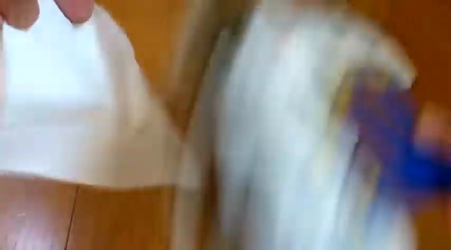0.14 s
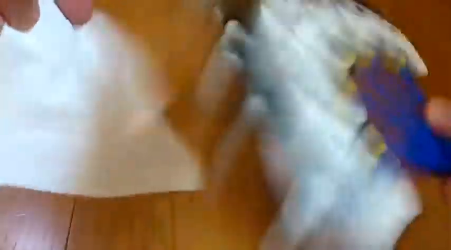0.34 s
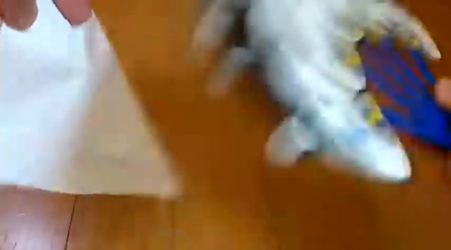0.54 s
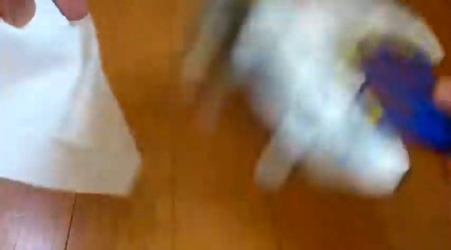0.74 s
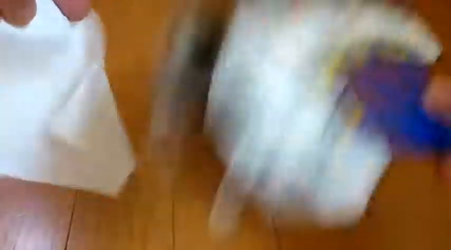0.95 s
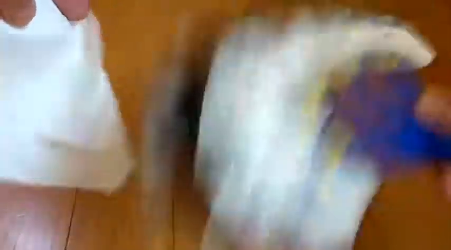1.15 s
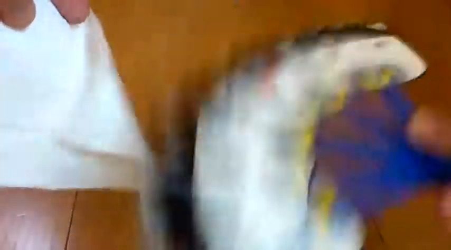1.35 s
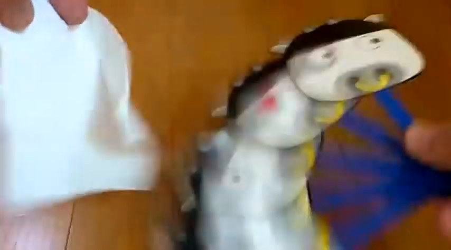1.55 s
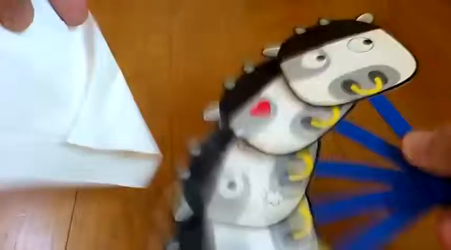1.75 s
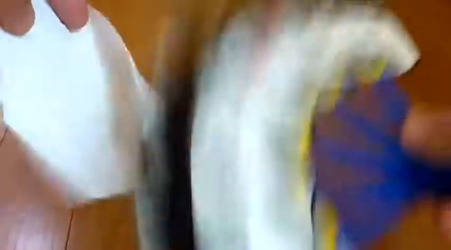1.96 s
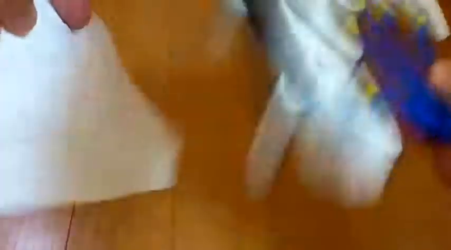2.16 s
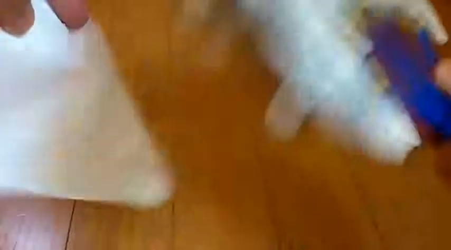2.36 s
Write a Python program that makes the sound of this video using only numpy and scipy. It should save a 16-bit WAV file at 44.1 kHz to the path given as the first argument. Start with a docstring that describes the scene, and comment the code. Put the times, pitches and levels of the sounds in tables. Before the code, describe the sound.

A paper fan with plastic ribs gives a few light ticks, a loud hollow double snap, then uneven soft rustling, clicking and short scrapes, close to the microphone in a small room with faint hiss.

```python
"""A faint mains hum, room rumble and soft hiss come first: low sines and coloured noise.
Close to the microphone a paper fan with plastic ribs is waved: its leaf rustles in showers of tiny
clicks at every turn of the hand, and its ribs tick and scrape. Early on it snaps taut with a double
crack, sharp noise bursts that knock the drum-like leaf. Fan modes, an echo and a short room tail
ring after the contacts; later come low draughts of air and a dull rub of the hand on the grip."""
import sys
import numpy as np
from scipy import signal
from scipy.fft import rfft, irfft
from scipy.io import wavfile
from scipy.ndimage import uniform_filter1d

SR = 44100
rng = np.random.default_rng(int(sys.argv[2]) if len(sys.argv) > 2 else 0)


def unload_wav(signal):
    """Save mono or channel-first audio to the path in sys.argv[1] as 16-bit WAV at rate SR, clipped to [-1, 1]."""
    wavfile.write(
        sys.argv[1],
        SR,
        np.round(np.clip(np.atleast_2d(signal).T, -1, 1) * 32767).astype(np.int16),
    )


N = 105840
HIT_SIZE = 4096  # samples in one contact
TILT_PIVOT_HZ = 5000  # a tilt leaves this pitch unchanged
RIB_SPREAD = 1  # independent left and right noise, relative to the shared noise
LEAF_PAN_DB = 2.5  # left minus right


def from_db(db):
    """Decibels to gain."""
    return 10 ** (np.asarray(db) / 20)


def rms_one(x):
    """Scale to unit rms."""
    return x / np.sqrt(np.mean(x ** 2) + 1e-20)


def bins(size):
    """Frequencies in Hz of a spectrum of that many samples, at least 1."""
    return np.maximum(np.arange(size // 2 + 1) * SR / size, 1)


def at_hz(points, size):
    """Read a table at every bin, along a log-frequency axis."""
    hz, value = np.transpose(points)
    return np.interp(np.log(bins(size)), np.log(hz), value)


def octaves_from_pivot():
    """Distance of each bin of a contact from the tilt pivot."""
    return np.log2(bins(HIT_SIZE) / TILT_PIVOT_HZ)


def panned(db):
    """Left and right gains for a level difference, left minus right."""
    return from_db(np.array([[.5], [-.5]]) * db)


def colour(x, db):
    """Causal (minimum-phase) filter with the given gain at each frequency."""
    size = x.shape[-1]
    cepstrum = irfft(np.log(from_db(db)), size)
    # folding the cepstrum forward makes the response minimum-phase
    cepstrum[1:size // 2] *= 2
    cepstrum[size // 2 + 1:] = 0
    return irfft(rfft(x) * np.exp(rfft(cepstrum)), size)


def wander(size, count):
    """Straight lines between that many random points of unit spread."""
    return np.interp(np.linspace(0, count - 1, size), np.arange(count), rng.standard_normal(count))


def swells(events, t):
    """Bell-shaped gains, each falling to 1/e one half length from its middle."""
    return sum(from_db(db) * np.exp(-((t - s) / half_s) ** 2) for s, db, half_s in events)


def add(out, s, sound):
    """Mix a sound in at a time in seconds."""
    start = int(s * SR)
    out[:, start:start + sound.shape[1]] += sound[:, :max(N - start, 0)]


# How alike left and right are in diffuse noise: pitch_hz, correlation (0 to 1)
STEREO_LIKENESS = [(600, 0.66), (1500, 0.05), (5000, 0.019)]


def diffuse(size):
    """Stereo noise from all around: alike in the bass, almost unrelated in the treble."""
    mid, side = rfft(rng.standard_normal((2, size)))
    alike = np.clip(at_hz(STEREO_LIKENESS, size), -1, 1)
    shared = np.sqrt((1 + alike) / 2) * mid
    opposed = np.sqrt((1 - alike) / 2) * side * [[1], [-1]]
    return irfft(shared + opposed, size)


# Spectrum of the still air of the room: pitch_hz, relative_level_db (per Hz)
AIR_COLOUR = [(25, 3.5), (60, 3.5), (150, -6), (205, -3), (300, -10), (1000, -10.5), (3500, -16.5),
              (5200, -17), (8500, -19.5), (10500, -24), (16000, -28)]


def background(air_db=-57, air_swell_db=0.72, hum_hz=119.8, hum_db=-61.5, hum_waver=0.35, pan_db=1.5):
    """Coloured noise gives low rumble and hiss; a sine wavering in phase and level gives mains hum."""
    t = np.arange(N) / SR
    air = rms_one(colour(diffuse(N), at_hz(AIR_COLOUR, N)))
    air_level = from_db(air_db + air_swell_db * wander(N, count=20))
    hum_wave = np.sin(2 * np.pi * hum_hz * t + .5 * wander(N, count=60))
    hum = rms_one(hum_wave * (1 + hum_waver * wander(N, count=24)))
    return panned(pan_db) * (air_level * air + from_db(hum_db) * hum)


# Tone of the papery clicks: pitch_hz, gain_db
CLICK_COLOUR = [(200, -12.5), (660, 1.5), (1200, -1), (3500, 0.5), (5500, 5), (8200, -2), (11000, -7.5)]


def grains(per_s, size_spread_db=3.5):
    """Tiny papery clicks of uneven size, different on the two sides; rms 1."""
    size_db = size_spread_db * np.minimum(rng.exponential(1, N), 3)  # no click outgrows the rest by far
    sizes = from_db(size_db) * rng.choice([-1, 1], N)
    happens = rng.random(N) < per_s / SR
    clicks = happens * sizes * (1 + RIB_SPREAD * rng.standard_normal((2, N)))
    return rms_one(colour(clicks, at_hz(CLICK_COLOUR, N)))


# The leaf rustles at each turn of the hand: peak_s, level_db
HAND_TURNS = [(.125, -59), (.275, -50), (0.347, -51.5), (0.579, -59.5), (.81, -57), (1.047, -55.5),
              (1.25, -59.5), (1.468, -56.5), (1.69, -54), (1.907, -54), (2.26, -63)]
# Ribs slide over each other: middle_s, level_db, half_length_s
RIB_SLIDES = [(0.355, -53.5, 0.004), (0.4878, -44, 0.0059), (1.685, -51, .005), (1.898, -44.5, 0.0039),
              (2.046, -43, 0.0034)]


def rustle(rise_s=0.017, fall_s=0.032, creases_per_s=1500, slips_per_s=4000, clump_db=4, pan_db=3):
    """Creases give way in clumps, swelling at each turn; sliding ribs add short gritty scrapes."""
    t = np.arange(N) / SR
    effort = from_db(-70)  # the leaf keeps flexing between the turns
    for s, db in HAND_TURNS:
        distance = np.maximum((s - t) / rise_s, (t - s) / fall_s)
        effort = effort + from_db(db) * np.exp(-distance)
    clumps = rms_one(from_db(clump_db * wander(N, count=260)))
    creases = effort * clumps * grains(creases_per_s)
    scrapes = swells(RIB_SLIDES, t) * grains(slips_per_s)
    return panned(pan_db) * (creases + scrapes)


def contact(db, decay_ms, shape_db, balance_db, spread, edge=2.8, right_lag_s=.00008):
    """A sharp edge and dying chatter, evened then coloured; level is its energy as rms over 5 ms."""
    t = np.arange(HIT_SIZE) / SR
    chatter = rng.standard_normal((3, HIT_SIZE)) * np.exp(-t * 1000 / decay_ms)
    chatter[0, 0] = edge
    sides = []
    for force, sign in zip(chatter[0] + spread * chatter[1:], (1, -1)):
        power = uniform_filter1d(np.abs(rfft(force)) ** 2, size=40)
        uneven_db = 10 * np.log10(power + 1e-12)
        sides.append(colour(force, shape_db - uneven_db + sign * balance_db / 2))
    sides[1] = np.roll(sides[1], int(right_lag_s * SR))
    faded = np.array(sides) * (1 - t / t[-1])
    return from_db(db) * rms_one(faded) * np.sqrt(.005 * SR / HIT_SIZE)


# Ribs knock against each other: start_s, level_db, tilt_db_per_octave
RIB_TICKS = [(.1086, -42, 1), (0.115, -49, -5), (0.1388, -42.5, 1.5), (0.1968, -42.5, 2), (.2868, -38, 4.5),
             (.3288, -43, 3), (.3389, -34.5, -0.5), (0.3565, -45, 5), (.3628, -46.5, -1.5),
             (0.4154, -48, 2), (.4241, -48.5, -1.5), (.558, -51.5, -2.5), (.5922, -50, 3),
             (0.649, -51.5, -1), (0.7266, -44, 3), (.774, -53, 0), (.7909, -44, -3), (.8041, -47.5, -3),
             (0.8198, -45, 0.5), (0.8718, -41, .5), (1.0257, -43, -2), (1.1684, -50.5, 6),
             (1.212, -51.5, -4), (1.2301, -41.5, -2.5), (1.2602, -43, -1.5), (1.3209, -47.5, -1.5),
             (1.3645, -48.5, 6), (1.453, -50, -2), (1.4816, -45, -4), (1.5592, -52.5, -1),
             (1.5905, -48, 1.5), (1.6585, -50.5, -4), (1.6751, -40.5, -5), (1.7046, -42, -2),
             (1.7565, -39, 1), (1.883, -48, -6.5), (1.9158, -47.5, -3.5), (1.9636, -42, 3),
             (2.0424, -39.5, 3.5), (2.0572, -45.5, 3.5), (2.1189, -42, 1.5), (2.1275, -44, 5.5),
             (2.258, -47, -1.5), (2.3350, -48.5, -2.5), (2.385, -43, 2)]
# Tone of the ribs: pitch_hz, gain_db
RIB_TONE = [(300, -35), (1000, -31), (2200, -6), (2650, 4), (3500, 3), (4700, 5.5), (6000, 1), (8400, 1),
            (10000, -9), (16000, -17.5)]
# Stereo lean of the ribs: pitch_hz, left_minus_right_db
RIB_LEAN = [(600, 1.5), (3000, -0.5), (5000, 1.5), (7800, 15.5), (13000, 7.5)]
# Tone of the leaf under a tick: pitch_hz, gain_db
FLAP_TONE = [(250, -0.5), (520, 0.5), (700, 5), (1250, -1.5), (1900, 4.5), (6000, -38.5)]


def ticks(decay_ms=1.85, ripple_db=5, leaf_decay_ms=8.4, leaf_db=-13, leaf_db_per_tilt=-1.0):
    """Light knocks, each with a colour of its own, shake the leaf a little; dull ones shake it more."""
    out, octaves = np.zeros((2, N)), octaves_from_pivot()
    rib_db, lean_db = at_hz(RIB_TONE, HIT_SIZE), at_hz(RIB_LEAN, HIT_SIZE)
    flap_db = at_hz(FLAP_TONE, HIT_SIZE)
    for s, db, tilt in RIB_TICKS:
        shape_db = rib_db + tilt * octaves + ripple_db * wander(len(octaves), count=40)
        add(out, s, contact(db, decay_ms, shape_db, lean_db, RIB_SPREAD))
        flap_level_db = db + leaf_db + leaf_db_per_tilt * tilt
        add(out, s, contact(flap_level_db, leaf_decay_ms, flap_db, LEAF_PAN_DB, spread=0.44))
    return out


# The fan snaps taut: start_s, level_db, decay_ms, tilt_db_per_octave
SNAP_CRACKS = [(0.2367, -18, 1.36, -0.5), (0.2386, -19.5, 1.8, -0.5), (0.2517, -12.5, 0.94, 2.5)]
# Tone of the cracks: pitch_hz, gain_db
CRACK_TONE = [(150, -47.5), (330, -15), (700, -10), (1100, -3.5), (1700, -12), (2300, -3), (3250, 4.5),
              (4100, 1), (5000, 4), (5900, -3), (6800, 5), (8200, 1), (9800, -13.5), (13000, -9.5),
              (16000, -31)]
# Stereo lean of the cracks: pitch_hz, left_minus_right_db
CRACK_LEAN = [(500, -22), (2000, 12), (3300, 4), (5000, 3.5), (7600, 18.5), (10000, 21), (14000, 0)]


def snap():
    """Hard contacts of the ribs as the fan goes taut, close enough to be heard as a double crack."""
    out, octaves = np.zeros((2, N)), octaves_from_pivot()
    crack_db, lean_db = at_hz(CRACK_TONE, HIT_SIZE), at_hz(CRACK_LEAN, HIT_SIZE)
    for s, db, decay_ms, tilt in SNAP_CRACKS:
        add(out, s, contact(db, decay_ms, crack_db + tilt * octaves, lean_db, RIB_SPREAD))
    return out


# The open fan rings on: pitch_hz, peak_gain_db, t60_s
OPEN_FAN_MODES = [(490, -10, 0.044), (653.5, 11, 0.095), (3424, 1.5, 0.013)]


def ringing(x):
    """Ticks, cracks and rustle all excite the same few resonances of the open fan."""
    out = 0
    for hz, db, t60 in OPEN_FAN_MODES:
        r = from_db(-60 / (t60 * SR))  # decay per sample
        top = [(1 - r * r) / 2, 0, (r * r - 1) / 2]
        bottom = [1, -2 * r * np.cos(2 * np.pi * hz / SR), r * r]
        out = out + from_db(db) * signal.lfilter(top, bottom, x)
    return out


# Each crack strikes the leaf: start_s, gain_db
LEAF_STRIKES = [(0.2375, -2.5), (.2526, -9.5)]
# The taut leaf bellies out and knocks like a drum skin: pitch_hz, level_db (before gain), t60_s
TAUT_LEAF_MODES = [(70.6, -28.5, 0.025), (230, -37, 0.016), (458.4, -34.5, 0.059), (588, -32, 0.035),
                   (653, -28, .075), (735, -28.5, 0.055), (1030, -30, 0.048), (1364, -27, 0.023),
                   (1842, -44.5, 0.21)]


def leaf_knock():
    """The hollow modes of the taut leaf as dying sines, struck once for each half of the double crack."""
    out = 0
    for s, knock_db in LEAF_STRIKES:
        t = np.maximum(np.arange(N) / SR - s, 0)
        for hz, db, t60 in TAUT_LEAF_MODES:
            out = out + from_db(knock_db + db - 60 * t / t60) * np.sin(2 * np.pi * hz * t)
    return panned(LEAF_PAN_DB) * out


# Tone of the room tail: pitch_hz, gain_db
ROOM_TONE = [(200, -4), (650, 4.5), (1200, 2.5), (5000, -4), (7500, -6.5)]


def room(x, echo_s=.0074, echo_db=-13, echo_low_hz=3500,
         tail_db=-11, delay_s=0.0055, build_s=0.0014, t60_s=0.15):
    """One bright echo off the floor, and a quick diffuse decay fed by the left side."""
    size = 2 ** 15
    t = np.maximum(np.arange(size) / SR - delay_s, 0)
    tail = diffuse(size) * from_db(-60 * t / t60_s) * (1 - np.exp(-t / build_s))
    tail = rms_one(tail) / np.sqrt(size)  # unit energy before colour
    tail = colour(tail, tail_db + at_hz(ROOM_TONE, size))
    late = np.pad(x, ((0, 0), (int(echo_s * SR), 0)))[:, :N]
    echo = signal.lfilter(*signal.butter(1, echo_low_hz, "high", fs=SR), late)
    decay = signal.fftconvolve(x[:1], tail, axes=1)[:, :N]
    return from_db(echo_db) * echo + decay * panned(db=3.0)


# Draught of the fan on the microphone: time_s, level_db
DRAUGHT_LEVEL = [(.75, -87), (.92, -63), (1.55, -60), (1.8, -66), (2.3, -61)]
# Tone of the draught: pitch_hz, gain_db
DRAUGHT_TONE = [(25, -6), (54, -2), (200, -13.5), (600, -45.5)]


def draught():
    """The strokes send lumpy air over the microphone: deep noise that swells and sinks."""
    level = from_db(np.interp(np.arange(N) / SR, *np.transpose(DRAUGHT_LEVEL)))
    rumble = rms_one(colour(diffuse(N), at_hz(DRAUGHT_TONE, N)))
    return panned(LEAF_PAN_DB) * level * rumble


# The hand shifts on the grip: middle_s, level_db, half_length_s
GRIP_RUBS = [(2.175, -61.5, 0.12)]


def grip(band_hz=(127, 233)):
    """A soft low rub of the fingers on the ribs: a swell of band-limited noise."""
    band = signal.butter(2, band_hz, "band", fs=SR, output="sos")
    rub = rms_one(signal.sosfilt(band, diffuse(N)))
    return swells(GRIP_RUBS, np.arange(N) / SR) * rub


def scene():
    """The fan in its room."""
    fan = rustle() + ticks() + snap()
    fan = fan + ringing(fan) + leaf_knock()
    return background() + fan + room(fan) + draught() + grip()


def record(dry, cutoff_hz=16000):
    """Peaks past full scale are clipped flat, then a steep low-pass removes the top."""
    low_pass = signal.ellip(10, .1, 70, cutoff_hz, fs=SR, output="sos")
    return signal.sosfilt(low_pass, np.clip(dry, -1, 1))


dry = scene()
out = record(dry)
unload_wav(out)
```